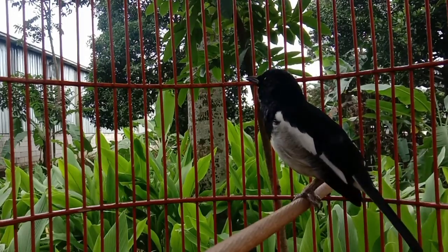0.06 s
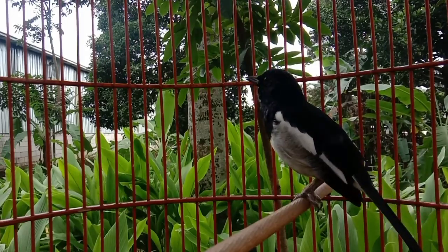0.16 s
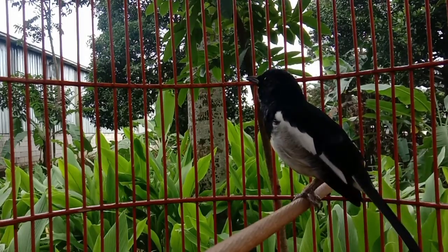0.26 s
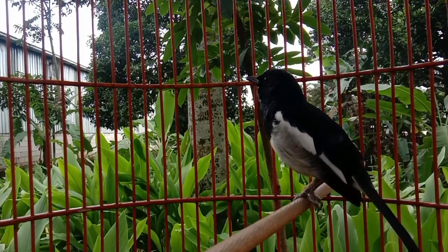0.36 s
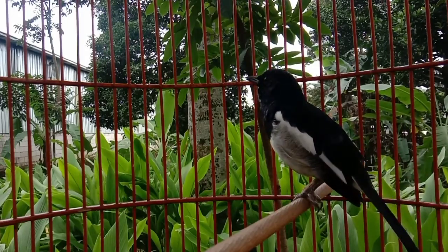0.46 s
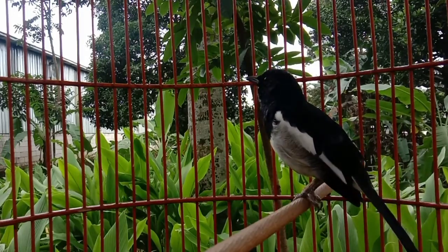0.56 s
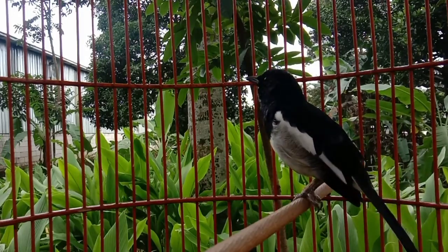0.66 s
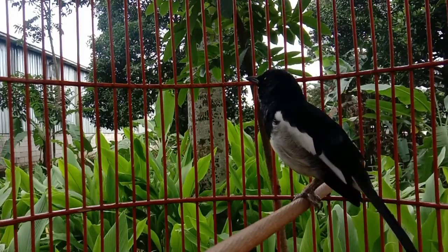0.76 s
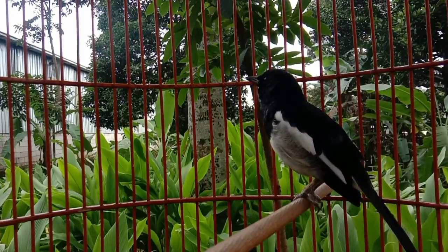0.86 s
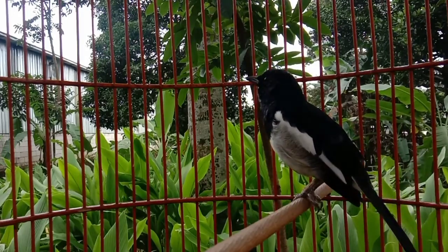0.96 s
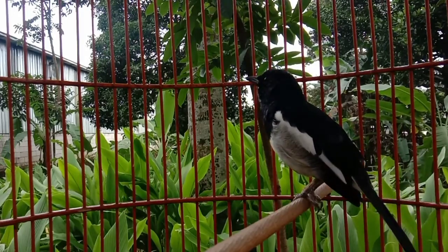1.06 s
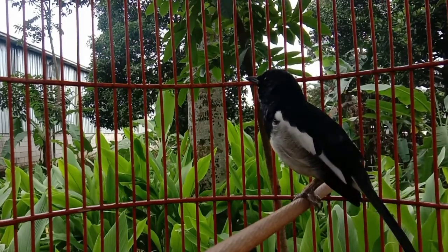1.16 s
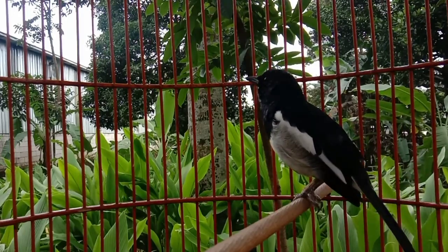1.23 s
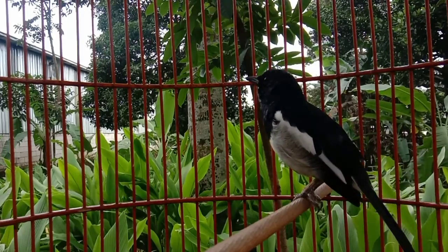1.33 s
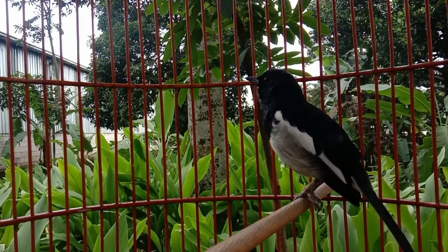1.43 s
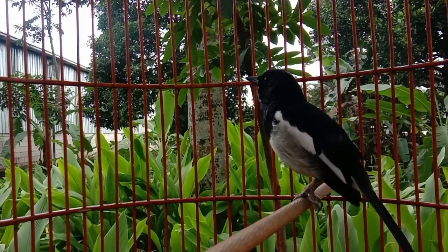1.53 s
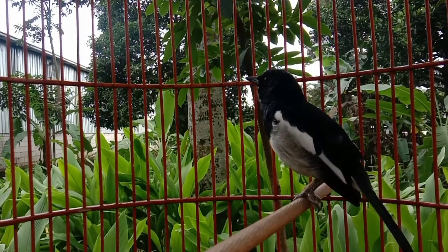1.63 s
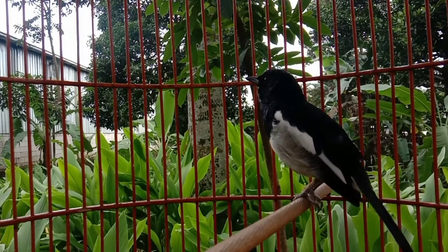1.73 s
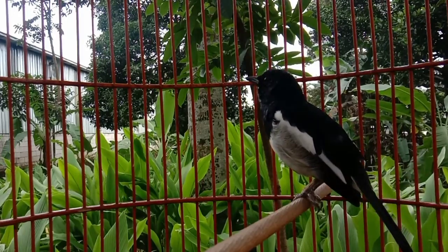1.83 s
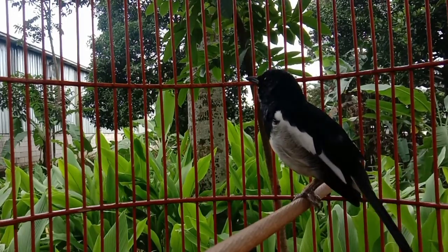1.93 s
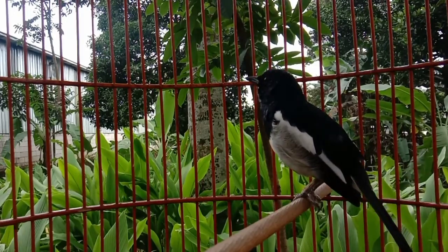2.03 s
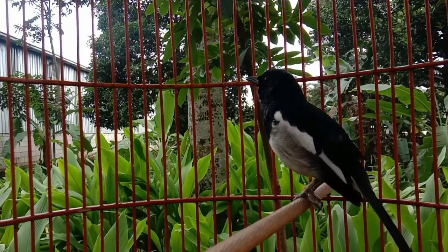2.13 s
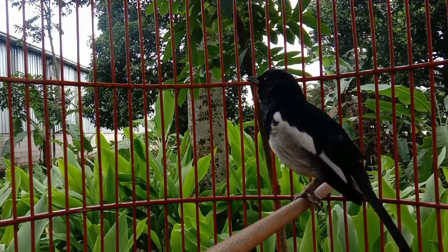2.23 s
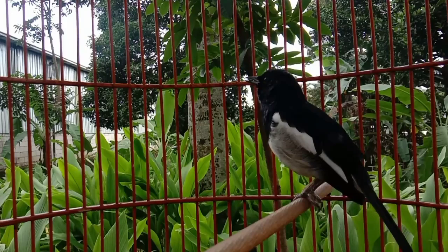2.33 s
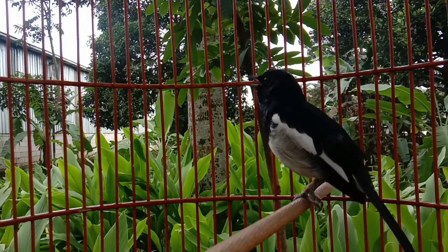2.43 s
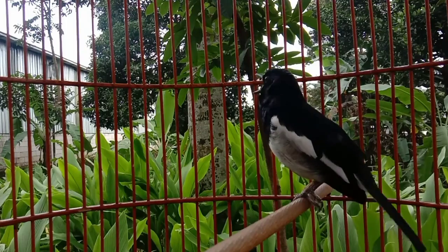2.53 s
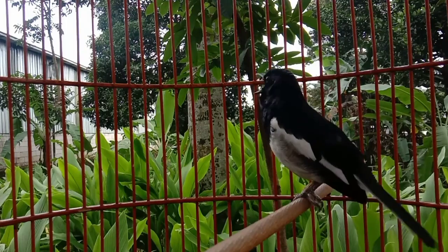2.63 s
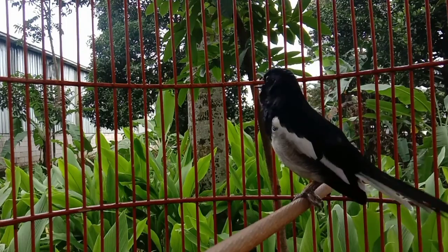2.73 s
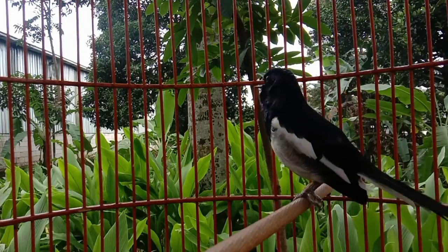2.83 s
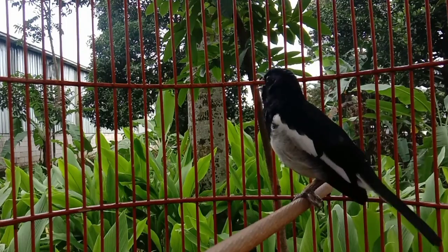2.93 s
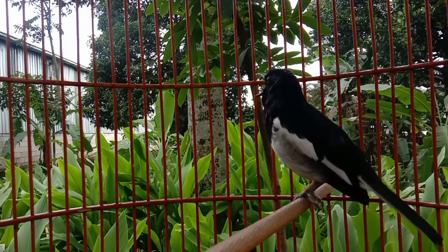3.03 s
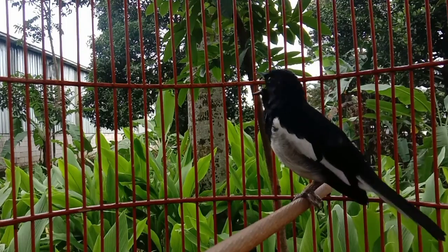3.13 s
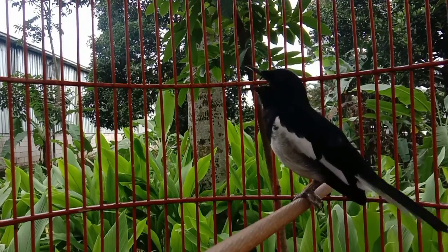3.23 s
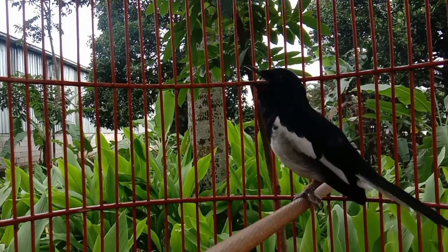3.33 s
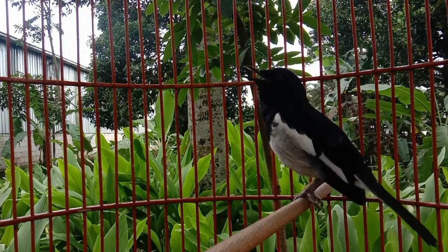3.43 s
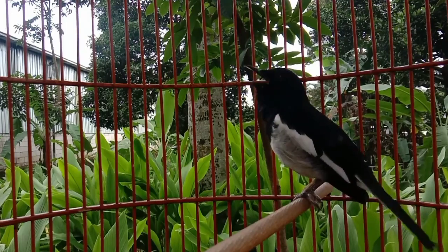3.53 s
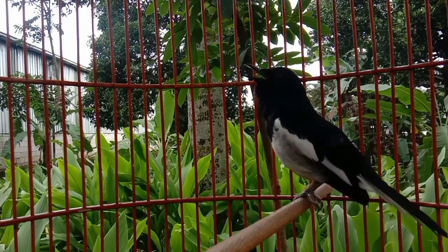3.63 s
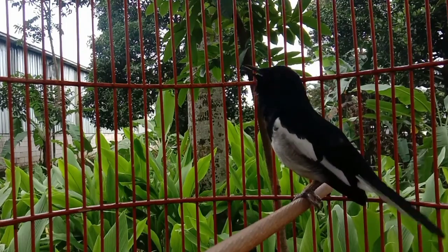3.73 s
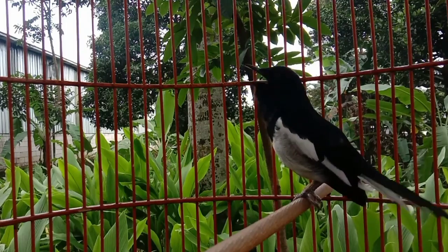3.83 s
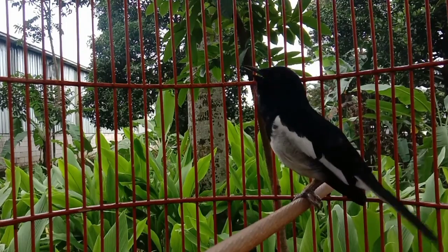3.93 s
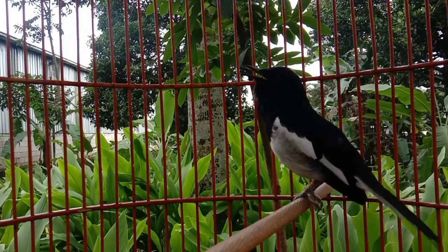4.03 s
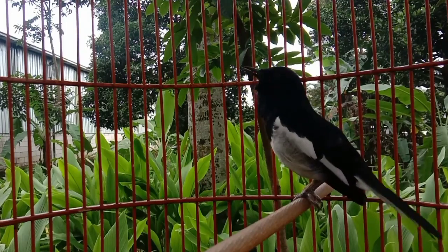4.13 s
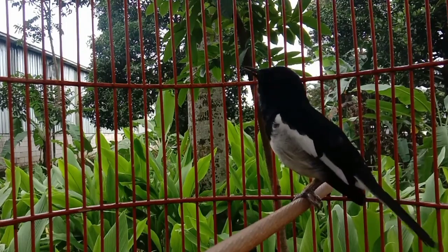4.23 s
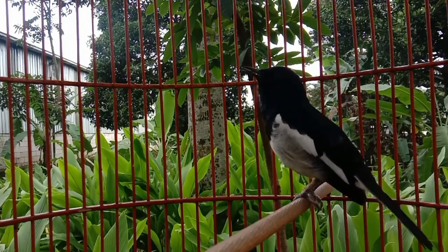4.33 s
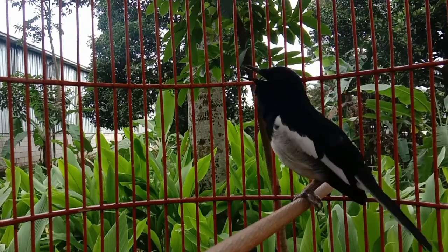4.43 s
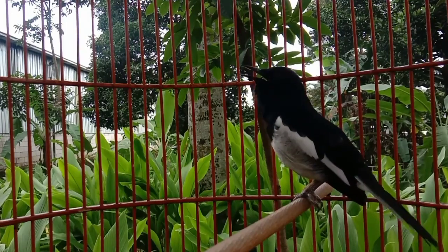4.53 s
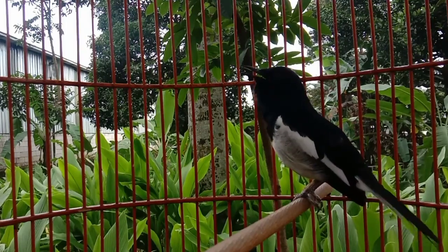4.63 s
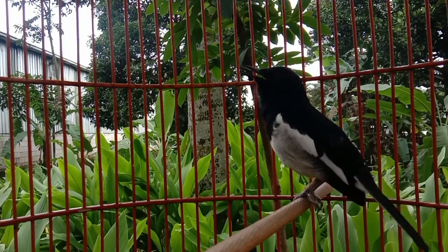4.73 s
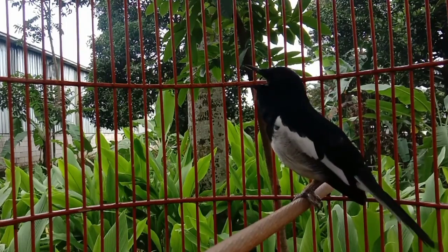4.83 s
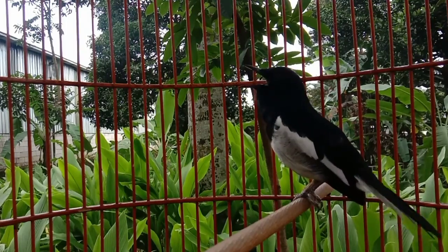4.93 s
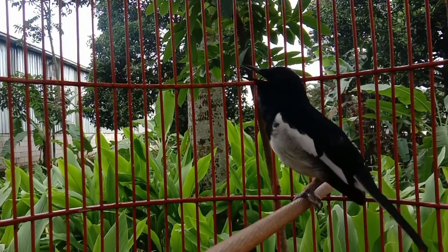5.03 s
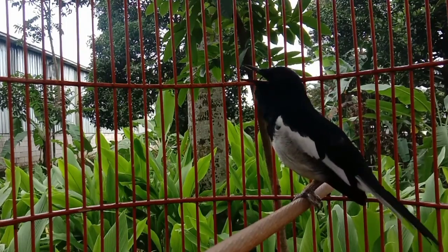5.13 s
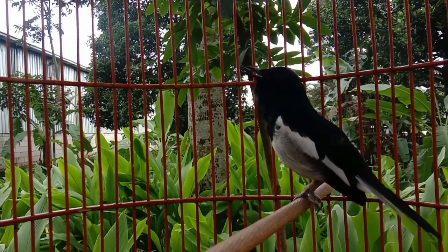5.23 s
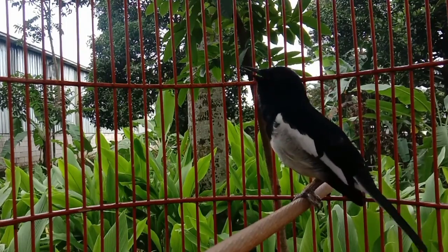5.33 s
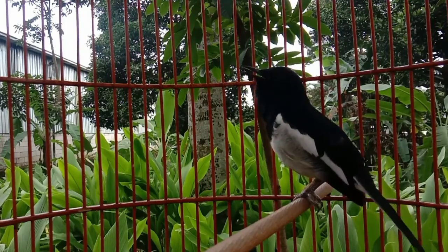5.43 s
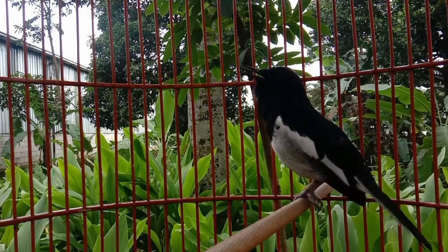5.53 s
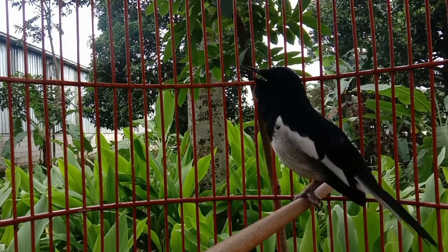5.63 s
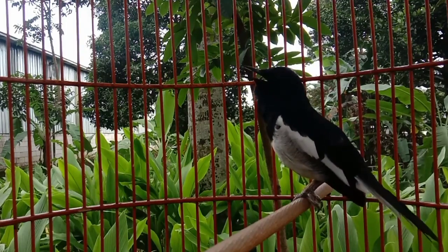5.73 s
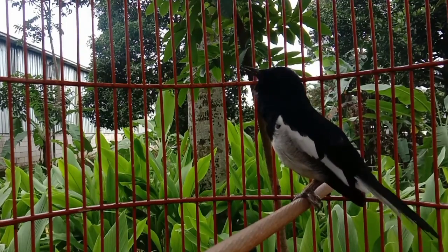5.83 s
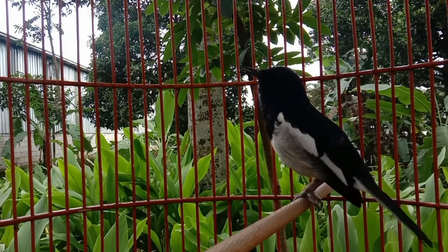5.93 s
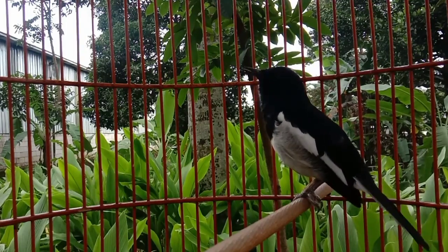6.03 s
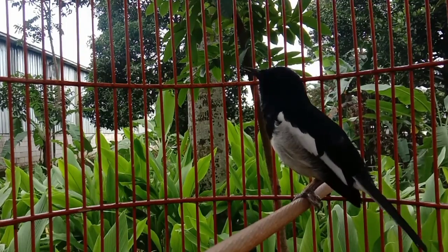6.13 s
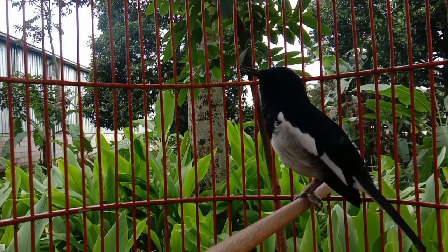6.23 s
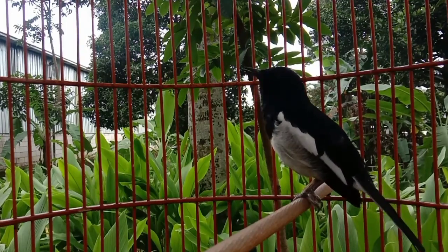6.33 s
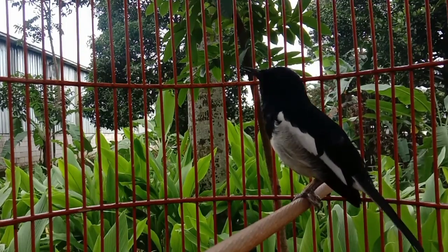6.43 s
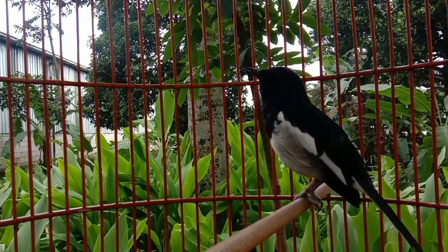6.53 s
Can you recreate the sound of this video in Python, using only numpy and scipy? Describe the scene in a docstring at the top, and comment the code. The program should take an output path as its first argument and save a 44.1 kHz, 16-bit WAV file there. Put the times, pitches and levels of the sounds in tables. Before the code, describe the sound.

A quiet garden opens with small bird calls, a faint faraway rooster and a few soft rustles over low traffic rumble and thin insect hiss. Then a caged songbird close to the microphone sings a loud phrase of about ten whistled notes, gliding mostly downward, some breaking into fast trills and rasps. It stops shortly before the end, leaving distant chirps.

```python
"""Caged magpie-robin in a garden

Close to the microphone the robin whistles loudly with the valves of its syrinx; some notes break into
fast trills, and both sides sounding together make a two-voiced rasp. Farther off, other birds and a
rooster call over insect hiss, rustles and the rumble of distant traffic. Walls and trees answer, and
the recorder's gain control ducks the garden under each note."""
import sys
import numpy as np
from scipy import signal
from scipy.fft import rfft, irfft, next_fast_len
from scipy.io import wavfile
from scipy.ndimage import uniform_filter1d, minimum_filter1d, map_coordinates

SR = 44100
rng = np.random.default_rng(int(sys.argv[2]) if len(sys.argv) > 2 else 0)


def wav_out(sig):
    """Save sig, one row per channel (or a flat mono array), as 16-bit PCM at SR to the path in sys.argv[1]."""
    wavfile.write(sys.argv[1], SR, np.round(np.clip(np.atleast_2d(sig).T, -1, 1) * 32767).astype(np.int16))


N = 289296

# Spectra of distant traffic, leaf hiss and rustles. Each row: frequency in Hz, relative level in dB.
TRAFFIC_SPECTRUM = [(25, -26), (45, -21.5), (62, -10), (82, 3.5), (125, -4.5), (170, -10.5), (230, -15),
                    (350, -20), (600, -29.5), (850, -28), (1100, -42.5), (2000, -55.5)]
LEAF_SPECTRUM = [(800, 1), (1080, -3), (1270, 6.5), (1600, -5), (3000, -7), (5000, -19.5), (7000, -15.5),
                 (8500, -21), (11500, -23.5), (15500, -28.5)]
RUSTLE_SPECTRUM = [(88, -44), (150, -11), (375, -2), (593, -3.5), (781, -4.5), (905, -18), (1260, 6.5),
                   (1510, -9), (2820, -8.5), (7180, -20.5), (8170, -27.5), (9990, -27), (12000, -67),
                   (15600, -69), (22000, -120)]
# Bands of insect song. Each row: centre in Hz, width in Hz, level in dB, flutter in dB.
INSECTS = [(9877, 430, -61.5, 1), (4280, 120, -77, 4), (5620, 220, -75.5, 2.5)]
# The tail from walls and trees. Each row: frequency in Hz, time to fall 60 dB in seconds.
YARD_DECAY = [(300, 0.23), (2500, 0.59), (5000, 0.9), (12000, 0.13)]
# Brief rustles. Each row: start in seconds, level in dB, rise and time to fall 60 dB in seconds.
RUSTLES = [(0.923, -45.5, 0.046, 0.48), (1.808, -53.5, 0.0031, 0.29), (2.389, -56.5, 0.061, .5),
           (6.058, -63, 0.02, 0.26), (6.3, -78, 0.014, 0.076)]
# Syllables of the far crow. Each row: start and length in seconds, first, middle and last pitch in Hz,
# level in dB, weight of the fundamental in dB.
CROW_SYLLABLES = [(0, 0.4, 742, 762, 765, -62, 0.5), (0.356, 0.22, 826, 834.5, 806, -61.5, 9),
                  (0.545, .68, 793.6, 796, 791, -62.5, 9), (1.187, 1, 763, 759.8, 718.6, -58.5, -7.5)]
# The rooster's overtones. Each row: harmonic number, weight in dB.
CROW_HARMONICS = [(2, 10.5), (3, -20.5), (4, -12)]
# Calls of farther birds. Each row: start and length in seconds, first, middle and last pitch in Hz,
# level in dB, buzz from 0 to 1.
FAR_CALLS = [ (0.01, 0.31, 2520, 2556, 2450, -68, 0.25), (0.208, .15, 2190, 2140, 2125, -68, 0.28),
             (0.516, 0.65, 3130, 3130, 3120, -74, 0.2), (0.663, .15, 3800, 3680, 3500, -63.5, 0.72),
             (0.726, .21, 4320, 4100, 4060, -62.5, 0.43), (0.775, 0.17, 3050, 2980, 3076, -52.5, 0.46),
             (1.205, .33, 2920, 3210, 3380, -66.5, 0.3), (1.934, 0.16, 3260, 3176, 3030, -59.5, .15),
             (2.06, .15, 3780, 3326, 2650, -54, .15), (2.086, .13, 4520, 4610, 4740, -62.5, 0.4),
             (2.202, 0.11, 2220, 1993, 1640, -59, 0), (2.329, .13, 4400, 4494, 4480, -64, 0.63),
             (2.424, 0.094, 2836, 2655, 2500, -53, .05), (2.642, 0.082, 2650, 2380, 1900, -42, 0.3),
             (5.512, 0.051, 3470, 3295, 3250, -36.5, 0.48), (5.557, 0.16, 3040, 2875, 2860, -39, 0.2),
             (5.912, 0.096, 3020, 3030, 2950, -51, 0.6), (6.033, 0.09, 2450, 2015, 1820, -54, .15),
             (6.234, 0.14, 2080, 2442, 2610, -52.5, 0), (6.477, .1, 2540, 2680, 2560, -53.5, 0), ]
# The robin's notes, on the first side of the syrinx. Each row: relative level in dB, attack in seconds,
# sag in dB per second, weights in dB of the second harmonic and of the high overtones at the start and
# at the end, pitch contour as (seconds, Hz) points.
ROBIN_NOTES = [ (-15, 0.015, -1, -33, -59.5, -39.5, [(2.532, 3101), (2.59, 3194), (2.64, 3200),
               (2.665, 3298), (2.74, 3149), (2.81, 2785), (2.886, 2752)]),
               (-15, .009, 4.5, -18.5, -54, -31.5, [(3.003, 3590), (3.065, 3722), (3.10, 3649),
               (3.155, 3440), (3.24, 3615), (3.28, 3993), (3.35, 3762), (3.38, 3143)]),
               (-15.5, 0.0019, 2.5, -27.5, -38, -29.5, [(3.587, 3130), (3.615, 2844), (3.68, 2750),
               (3.707, 2600), (3.72, 2416)]), (-10.5, 0.00097, 168.5, -37.5, -41, -33, [(3.722, 2436),
               (3.733, 2292), (3.755, 1857), (3.774, 1576)]),
               (-15, 0.0044, 13, -36.5, -41, -29, [(3.801, 1950), (3.832, 2546), (3.852, 2995),
               (3.875, 3086), (3.93, 3020), (3.957, 2319)]),
               (-14, 0.0022, 30, -39.5, -52.5, -35, [(4.057, 2613), (4.09, 2523), (4.15, 2130),
               (4.172, 1852), (4.206, 1389)]), (-14.5, 0.011, 8, -35, -46.5, -42, [(4.461, 2676),
               (4.518, 2659), (4.56, 2497), (4.62, 2347), (4.72, 2204)]),
               (-11.5, 0.015, 11, -35.5, -58, -60, [(4.826, 3048), (4.885, 3105), (4.94, 3106),
               (5.037, 3069)]), (-14.5, 0.0088, 0, -33.5, -36, -43.5, [(5.139, 2875), (5.165, 2896),
               (5.203, 2726), (5.265, 2660), (5.29, 2480), (5.317, 2178), (5.356, 2126)]),
               (-14, 0.0043, 15.5, -32.5, -43.5, -39.5, [(5.489, 2287), (5.55, 2236), (5.67, 2412),
               (5.79, 2485), (5.83, 2362), (5.878, 1642), (5.90, 1206), (5.92, 957)]), ]
# The second side, sounding against the first. Each row: relative level in dB, attack in seconds,
# sag in dB per second, pitch contour as (seconds, Hz) points.
SECOND_VOICE = [ (-20.5, 0.0064, 40, [(3.143, 3621), (3.215, 3314), (3.255, 3270), (3.28, 2747),
                (3.35, 2147), (3.378, 1646)]), (-25.5, 0.0068, 40, [(3.713, 2313), (3.745, 2268),
                (3.767, 1607)]), ]
# Runs of upward pitch flicks. Each row: first crest and end in seconds, first and last rate in flicks
# per second, first and last height in Hz when one side sings alone.
TRILLS = [(3.107, 3.156, 74, 69, 90, 900), (3.164, 3.28, 71, 72, 1000, 480),
          (3.655, 3.675, 67, 67, 170, 480), (3.693, 3.729, 41, 35, 600, 2200),
          (3.749, 3.756, 50, 50, 1500, 1500), (3.848, 3.93, 115, 60, 380, 10),
          (4.127, 4.186, 72, 44, 150, 850), (4.565, 4.70, 61, 51, 60, 140)]
# The robin's high overtones. Each row: harmonic number, weight in dB.
HIGH_OVERTONES = [(3, -4), (4, -1.5), (5, -13.5), (6, -3)]
# The throat colours the whistle, the beak its overtones and rasp. Each row: frequency in Hz, gain in dB.
THROAT_RESPONSE = [(1000, -21.5), (1350, -15.5), (1650, -5.5), (1900, -6), (2350, 1.5), (2700, 0.5),
                   (3300, 1), (3700, -2), (4200, -0.5)]
BEAK_RESPONSE = [(1000, -27), (3300, 12.5), (5500, -7.5), (6400, -1.5), (7000, -8), (7450, -4), (8200, -10),
                 (9300, 11), (10500, -2), (11300, 3.5), (12400, 0.5), (13600, 3.5), (15500, -5.5)]
# Pitches that near echoes cancel at the microphone. Each row: centre in Hz, width in Hz, depth in dB.
ECHO_NOTCHES = [(2064, 100, 17.5), (2934, 65, 9)]
# Turbulent air in the syrinx. Each row: frequency in Hz, relative level in dB.
TURBULENCE_SPECTRUM = [(900, 3.5), (2500, 2.0), (4500, 13.5), (7500, -2.5), (9500, 3.5), (12300, -2),
                       (13700, -23), (15500, -6)]


def amp(db):
    """Decibels to gain."""
    return 10 ** (np.asarray(db) / 20)


def unit(x):
    """Scale to rms 1."""
    return x / np.sqrt(np.mean(x ** 2) + 1e-20)


def clock():
    """The time of each sample in seconds."""
    return np.arange(N) / SR


def along(points, hz):
    """Interpolate (Hz, value) points on a log frequency axis."""
    f, v = np.transpose(points)
    return np.interp(np.log(hz + 1), np.log(f + 1), v)


def wobble(rate):
    """A smooth random curve, rate knots a second."""
    return map_coordinates(rng.standard_normal(int(N * rate / SR) + 4), [clock() * rate])


def filtered(x, response):
    """Filter x by a gain given as a function of frequency."""
    size = next_fast_len(N + 8192)
    return irfft(rfft(x, size) * response(np.fft.rfftfreq(size, 1 / SR)), size)[:N]


def noise(spectrum):
    """Coloured noise of rms 1."""
    return unit(filtered(rng.standard_normal(N), lambda f: amp(along(spectrum, f))))


def band(centre_hz, width_hz):
    """A bell-shaped band of noise of rms 1."""
    white = rng.standard_normal(N)
    return unit(filtered(white, lambda f: np.exp(-.5 * ((f - centre_hz) / width_hz) ** 2)))


def tone(hz):
    """A complex oscillation whose real part has rms 1."""
    return np.sqrt(2) * np.exp(2j * np.pi * np.cumsum(hz) / SR)


def envelope(start, end, attack_s, release_s, sag_db_per_s):
    """A quick rise, a sagging hold and a smooth close."""
    t = clock()
    age = np.maximum(t - start, 0)
    close = np.clip((end - t) / release_s, 0, 1)
    return (1 - np.exp(-age / attack_s)) ** 2 * amp(-sag_db_per_s * age) * np.sin(np.pi / 2 * close) ** 2


def arch(start, length, first_hz, middle_hz, last_hz):
    """A pitch that bends smoothly through three values."""
    progress = np.clip((clock() - start) / length, 0, 1)
    bend = middle_hz - (first_hz + last_hz) / 2
    return first_hz + (last_hz - first_hz) * progress + bend * (1 - (2 * progress - 1) ** 2)


def garden(traffic_db=-53.5, leaves_db=-66.5):
    """The bed of the place: distant traffic rumble, leaf hiss and bands of insect song."""
    traffic_level = amp(traffic_db + .5 * wobble(3) + 1.8 * wobble(16))
    leaves = amp(leaves_db + 2.2 * wobble(10)) * noise(LEAF_SPECTRUM)
    insects = sum(amp(db + flutter_db * wobble(5.5)) * band(hz, width)
                  for hz, width, db, flutter_db in INSECTS)
    return traffic_level * noise(TRAFFIC_SPECTRUM) + leaves + insects


def yard_echoes(x, tail_db, early_db, early_t60=0.048):
    """Near surfaces answer at once; walls and trees leave a longer tail."""
    hz, t, spectrum = signal.stft(rng.standard_normal(SR), SR, nperseg=256)
    decay = amp(-60 * t / along(YARD_DECAY, hz)[:, None])
    tail = signal.istft(spectrum * decay, SR, nperseg=256)[1][:SR]
    age = np.arange(SR) / SR
    early = rng.standard_normal(SR) * amp(-60 * age / early_t60)
    answer = amp(tail_db) * tail / np.linalg.norm(tail) + amp(early_db) * early / np.linalg.norm(early)
    return signal.fftconvolve(x, answer * (age > .003))[:N]


def rustles(grain_db=5.5):
    """Short grainy swishes that swell and die away."""
    t = clock()
    swell = sum(np.clip((t - start) / rise, 0, 1) ** 2
                * amp(db - 60 * np.maximum(t - start - rise, 0) / t60)
                for start, db, rise, t60 in RUSTLES)
    return swell * unit(noise(RUSTLE_SPECTRUM) * amp(grain_db * wobble(270)))


def rooster(jitter=0.0079, waver_db=2.6):
    """One far crow of four syllables, wavering on its way across the gardens."""
    out, unsteady = np.zeros(N), 1 + jitter * wobble(150)
    for start, length, *pitches, db, fundamental_db in CROW_SYLLABLES:
        phase = np.angle(tone(arch(start, length, *pitches) * unsteady))
        overtones = sum(amp(weight_db) * np.sin(round(k) * phase) for k, weight_db in CROW_HARMONICS)
        shape = envelope(start, start + length, attack_s=0.014, release_s=0.34 * length, sag_db_per_s=3)
        out += amp(db) * shape * unit(amp(fundamental_db) * np.sin(phase) + overtones)
    return out * amp(waver_db * wobble(27.12))


def far_birds(octave_db=-32):
    """Farther birds whistle and buzz, each call one bent glide."""
    out, flutter = np.zeros(N), .08 * wobble(800)
    for start, length, *pitches, db, buzz in FAR_CALLS:
        whistle = tone(arch(start, length, *pitches) * (1 + buzz * flutter))
        shape = envelope(start, start + length, attack_s=0.0047, release_s=.05, sag_db_per_s=12)
        out += amp(db) * shape * (whistle + amp(octave_db) * whistle ** 2).real
    return out


def syrinx_side(notes, slack_hz=2010, slack_db_per_octave=15.5):
    """One valve's pitch, amplitude, progress through the note (0-1) and further columns, per sample."""
    t = clock()
    *columns, contours = zip(*notes)
    starts, ends = np.array([(contour[0][0], contour[-1][0]) for contour in contours]).T
    current = np.maximum(np.searchsorted(starts, t) - 1, 0)
    start, end, db, attack, sag, *rest = [np.take(col, current) for col in (starts, ends, *columns)]
    hz = uniform_filter1d(np.interp(t, *np.concatenate(contours).T), size=180)
    # at low pitch the valve goes slack and weakens
    slack_db = slack_db_per_octave * np.log2(np.maximum(slack_hz / hz, 1))
    level = amp(db - slack_db) * envelope(start, end, attack, release_s=0.0076, sag_db_per_s=sag)
    return hz, level, np.clip((t - start) / (end - start), 0, 1), *rest


def trills():
    """Syrinx muscles flick the pitch upwards, dozens of times a second; gives the lift in Hz."""
    t, lift = clock(), np.zeros(N)
    for start, end, first_rate, last_rate, first_hz, last_hz in TRILLS:
        turns = np.cumsum(np.interp(t, [start, end], [first_rate, last_rate])) / SR
        turns -= np.interp(start, t, turns)
        height = np.interp(t, [start - .5 / first_rate, start, end, end + 0.0091],
                           [0, first_hz, last_hz, 0])
        lift += height * np.cos(np.pi * turns) ** 4
    return lift


def valve_overtones(motion, level, octave_db, edge_db, drive_db=-20):
    """The valves are not linear: powers of their motion give overtones, high ones under strong drive."""
    swing = motion / (np.sqrt(2) * level)
    drive = np.tanh(level / amp(drive_db))
    # their beam is narrow, so each wavers at the microphone as the beak moves
    high = sum(amp(db + 3.5 * wobble(17)) * (drive * swing) ** round(k) for k, db in HIGH_OVERTONES)
    octave = amp(octave_db + 2.5 * wobble(20)) * swing ** 2
    return np.sqrt(2) * level * (octave + amp(edge_db) * high).real


def chiffs(level_db=-41, tense_hz=2420):
    """Notes that start high, on a tense valve, open with a tiny puff of noise."""
    onsets = [contour[0] for *_, contour in ROBIN_NOTES]
    puffs = sum(np.exp(-((clock() - start - .001) / .002) ** 2) for start, hz in onsets if hz > tense_hz)
    return amp(level_db) * puffs * band(2940, 300)


def whistle_colour(f):
    """The throat holds back low pitches, and near echoes cancel a few narrow bands."""
    notches_db = sum(db / (1 + ((f - hz) / width) ** 2) for hz, width, db in ECHO_NOTCHES)
    return amp(along(THROAT_RESPONSE, f) - notches_db)


def robin(jitter=0.0026, clash_jitter=0.06, shimmer_db=.5, pinch_hz=420, choke_db=10, grit=.2,
          sharing_db=5, flick_loss=0.27, rough_edge_db=2.5, difference_db=-17, rasp_db=-24):
    """Two sides of the syrinx whistle; together they roughen and breed sum and difference tones."""
    hz, level, progress, octave_db, first_edge_db, last_edge_db = syrinx_side(ROBIN_NOTES)
    second_hz, second_level, _ = syrinx_side(SECOND_VOICE)
    # while the second side sounds, the first loses air and a share of its flick height
    sharing = np.tanh(second_level / (level + 1e-9)) ** .5
    level = level * amp(-sharing_db * sharing)
    lift = trills() * (1 - flick_loss * sharing)
    # each flick pinches the valve: the pitch leaps, the tone chokes and turns gritty, then rebounds
    pinch = np.tanh(lift / pinch_hz)
    strain = uniform_filter1d(pinch, size=900)
    level = level * amp(choke_db * (1 - sharing ** 2) * (strain - pinch) + shimmer_db * wobble(70))
    total = np.hypot(level, second_level) + 1e-9
    # the two sides disturb each other most when they are equally strong and close in pitch
    clash = 2 * level * second_level / total ** 2 / (1 + ((hz - second_hz) / 1500) ** 2)
    unrest = clash + grit * (pinch + strain) / 2
    first = level * tone((hz + lift) * (1 + jitter * wobble(130) + clash_jitter * unrest * wobble(1100)))
    second = second_level * tone(second_hz * (1 + clash_jitter * (unrest + grit) * wobble(700)))
    # the high overtones grow where a note turns rough
    edge_db = first_edge_db + (last_edge_db - first_edge_db) * progress
    edge_db += rough_edge_db * np.tanh(2 * strain + sharing)
    overtones = valve_overtones(first + second, total, octave_db, edge_db)
    difference = amp(difference_db) * (first * second.conj()).real / total
    turbulence = np.sqrt(np.abs(second_level * level)) + 2 * grit * strain * level
    rasp = amp(rasp_db) * turbulence * noise(TURBULENCE_SPECTRUM)
    bright = filtered(overtones + difference + rasp, lambda f: amp(along(BEAK_RESPONSE, f)))
    return filtered((first + second).real, whistle_colour) + bright + chiffs()


def scene(near_db=12.0):
    """One microphone by the cage: the robin close and nearly dry, the far sounds with more echo."""
    song = amp(near_db) * robin()
    far = far_birds() + rooster() + rustles()
    distant = far + yard_echoes(far, tail_db=-5, early_db=-9)
    close = song + yard_echoes(song, tail_db=-31.0, early_db=-10)
    return (close + distant + garden())[None]


def record(dry, knee_db=-17.0, max_duck_db=12.5, hold_s=0.0057, top_hz=15650):
    """The recorder's gain control looks just ahead, ducks loud sound and soon recovers; then a top cut."""
    mic = dry[0]
    loudness = np.sqrt(np.abs(uniform_filter1d(mic ** 2, size=128)))
    openness = 1 / (1 + (loudness / amp(knee_db)) ** 2)
    hold = int(hold_s * SR)
    held = uniform_filter1d(minimum_filter1d(openness, hold, origin=hold // 4), size=300)
    gain = amp(-max_duck_db * (1 - held))
    return filtered(mic * gain, lambda f: f < top_hz)[None]


dry = scene()
out = record(dry)
wav_out(out)
```